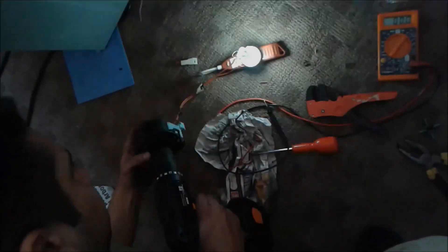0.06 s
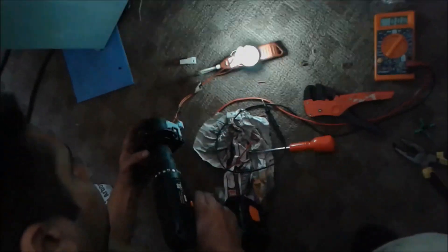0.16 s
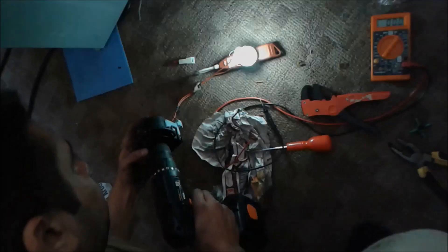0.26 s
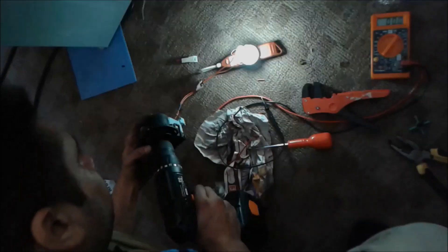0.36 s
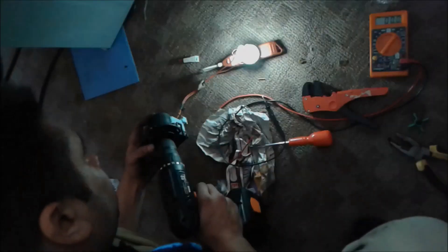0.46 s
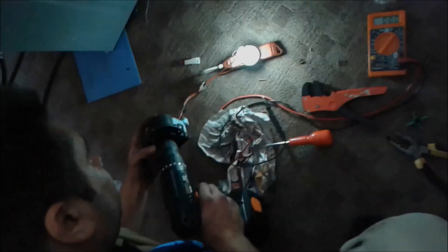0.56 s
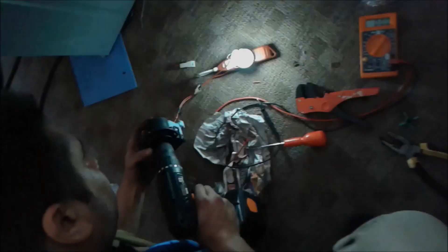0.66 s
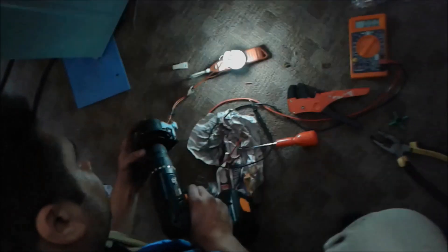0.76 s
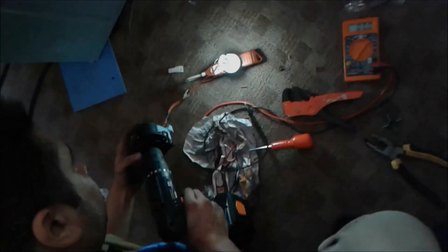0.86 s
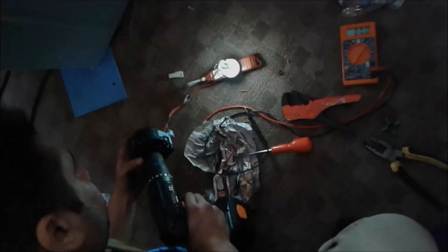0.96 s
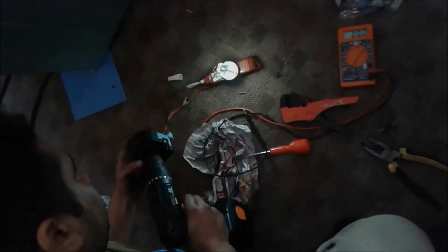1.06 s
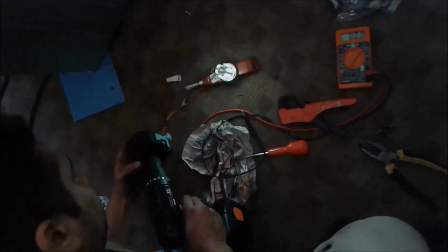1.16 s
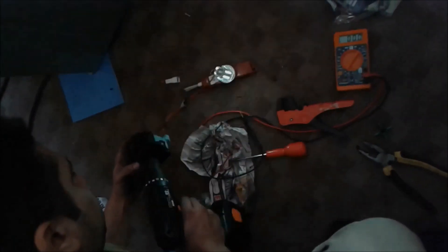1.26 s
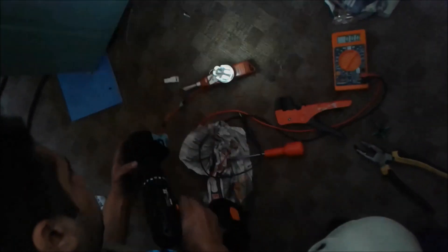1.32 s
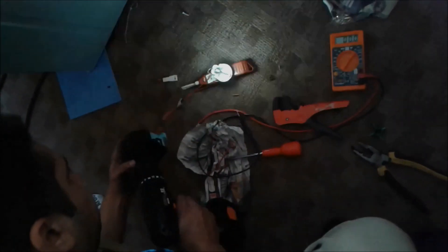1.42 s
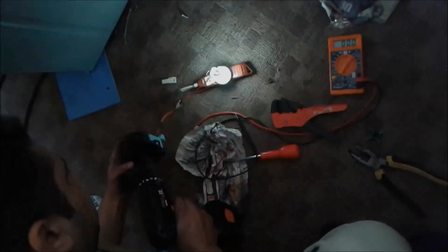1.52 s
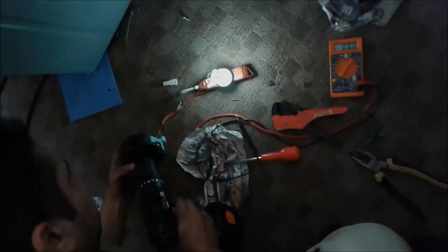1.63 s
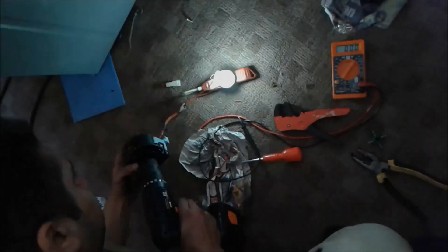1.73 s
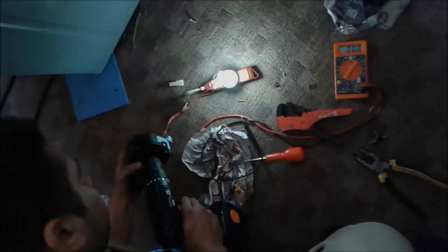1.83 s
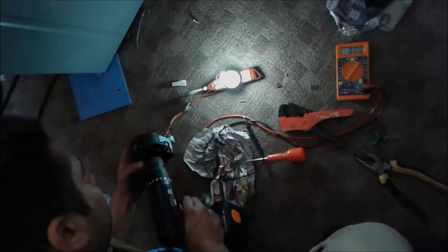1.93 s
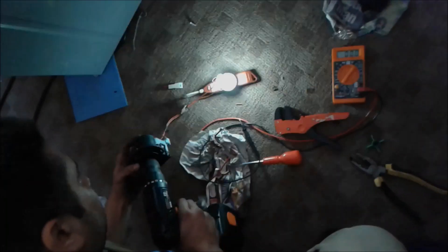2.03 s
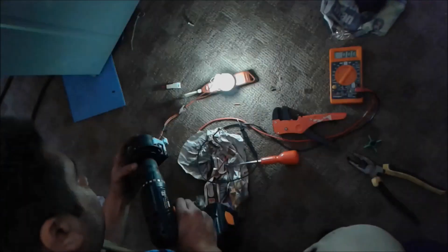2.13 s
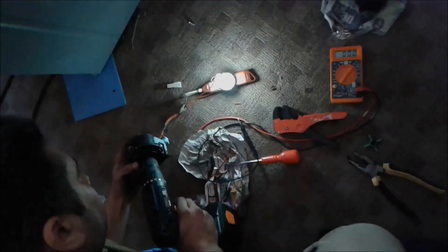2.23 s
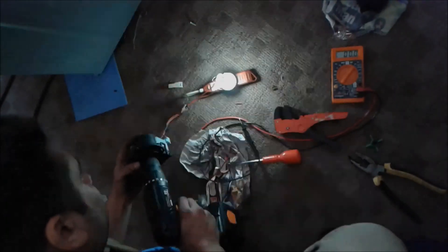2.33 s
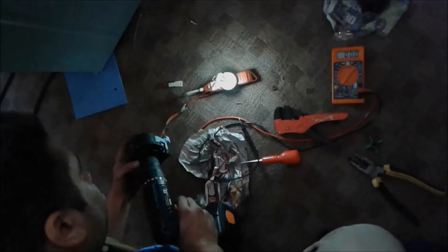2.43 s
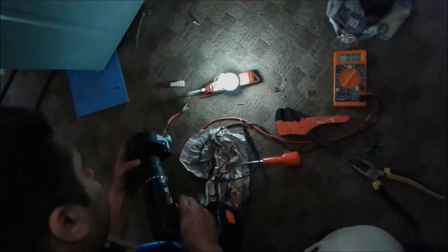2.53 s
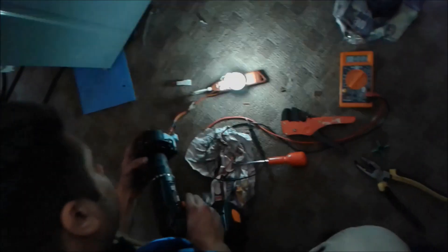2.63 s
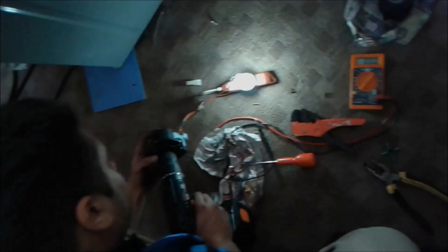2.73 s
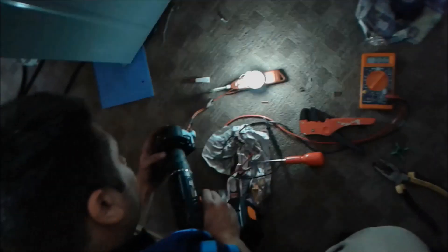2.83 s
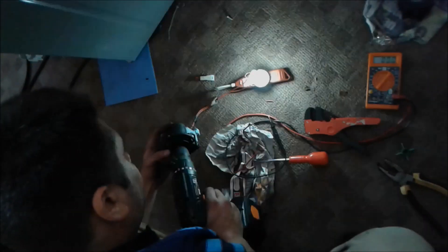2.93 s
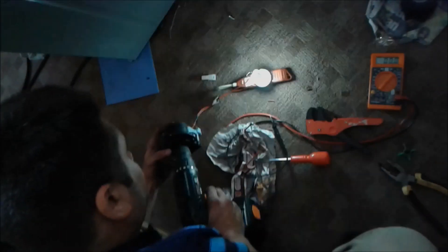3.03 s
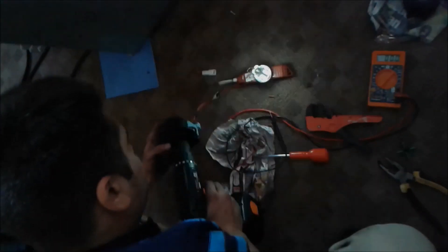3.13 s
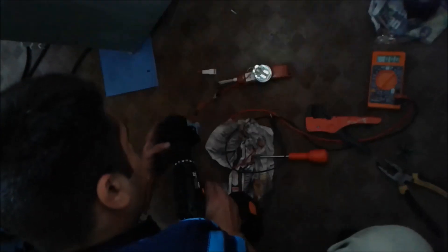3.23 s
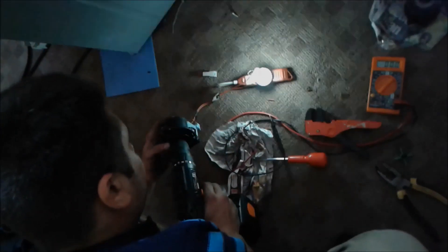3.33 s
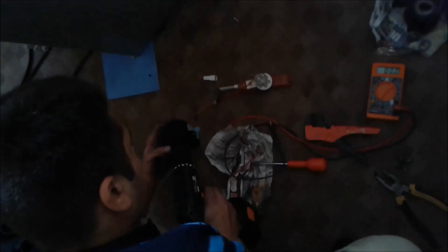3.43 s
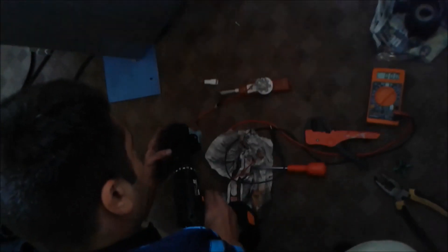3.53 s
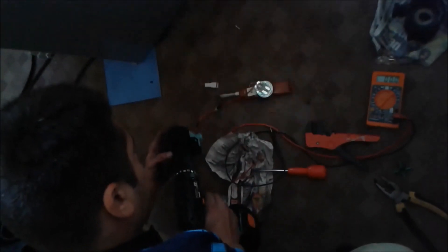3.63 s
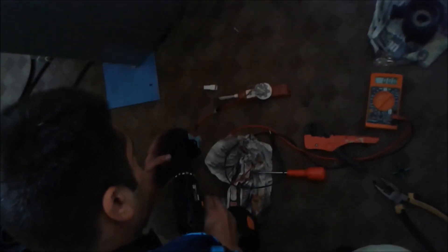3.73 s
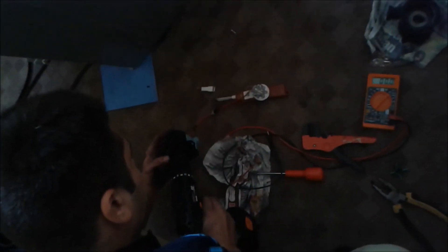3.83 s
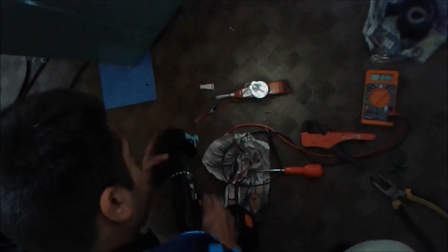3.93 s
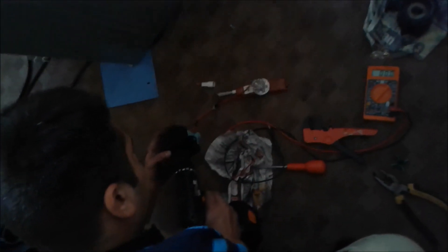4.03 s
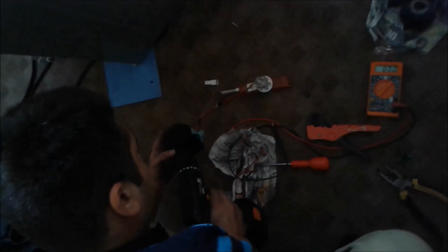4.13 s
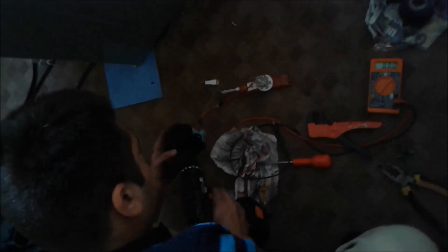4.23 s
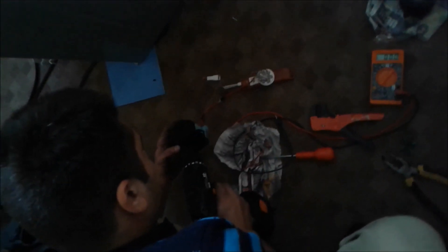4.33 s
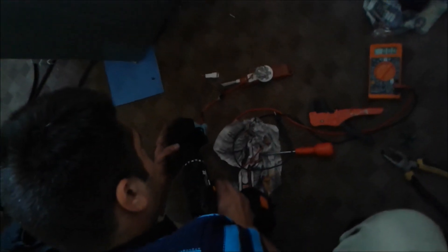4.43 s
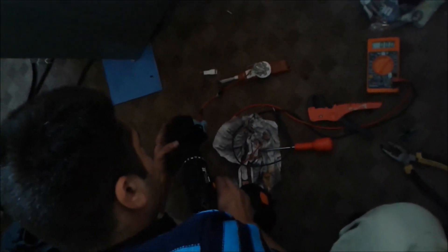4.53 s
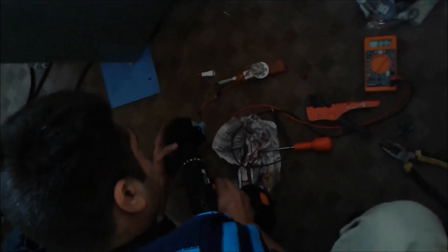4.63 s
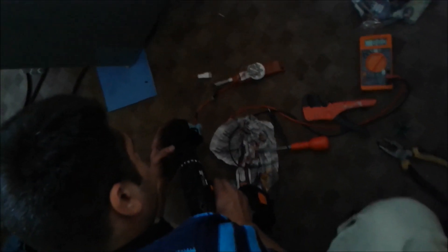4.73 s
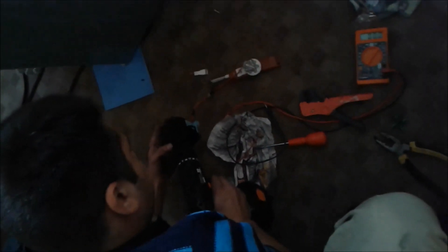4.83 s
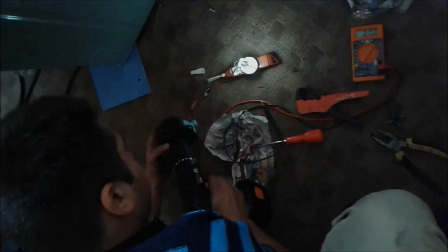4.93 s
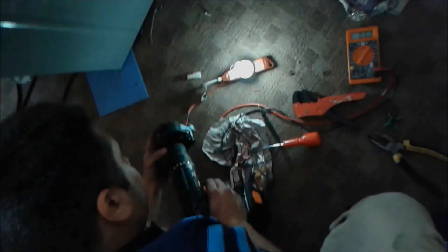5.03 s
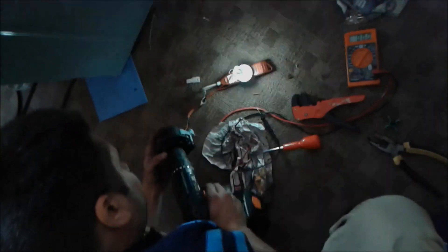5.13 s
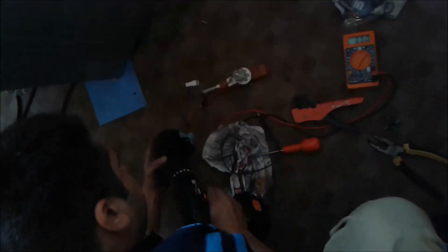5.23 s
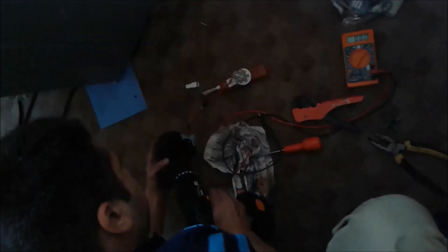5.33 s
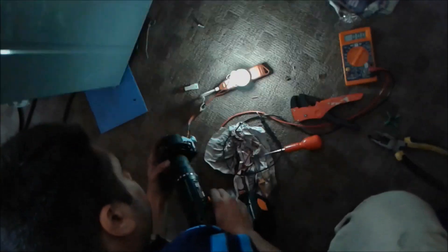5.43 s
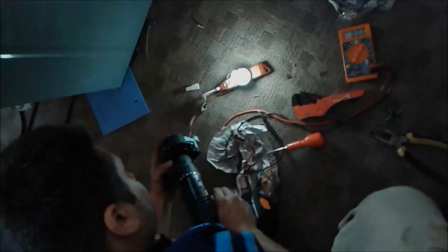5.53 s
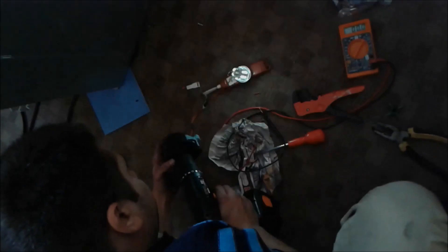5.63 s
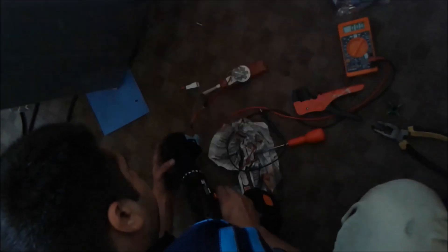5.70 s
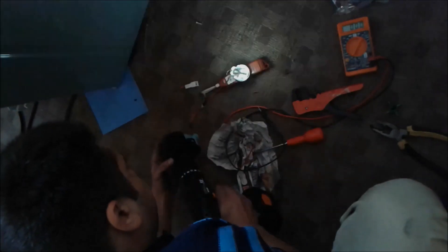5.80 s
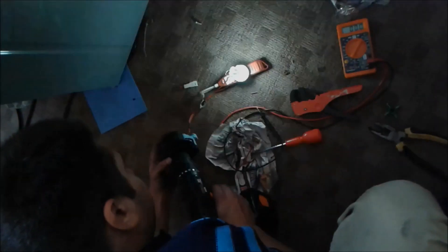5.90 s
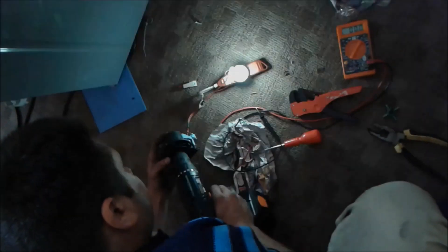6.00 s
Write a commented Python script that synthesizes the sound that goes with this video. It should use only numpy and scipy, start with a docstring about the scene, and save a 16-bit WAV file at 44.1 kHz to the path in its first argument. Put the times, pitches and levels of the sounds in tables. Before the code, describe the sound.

Close gritty drill-motor buzz with a fast throb, gliding down to a rattling stop, brief quiet, then clacks and a squealing, labouring restart indoors.

```python
"""A cordless drill close by on the floor of a small room first runs at full speed, a pump motor in its chuck.
Random gear-tooth impacts, shaped by spectral peaks of the housing and of a close reflection, throb with the
chuck under shaft-locked sine tones. As the trigger is eased the drill winds down, the tone of its torque ripple
gliding, then creeps and stops. Clacks of play precede and follow a restart below full speed, which sags twice as
the pump binds; brief squeals, made of unsteady resonances, sound as the rotor picks up speed."""
import sys
import numpy as np
from scipy import signal
from scipy.fft import rfft, irfft
from scipy.io import wavfile
from scipy.ndimage import uniform_filter1d

SR = 44100
rng = np.random.default_rng(int(sys.argv[2]) if len(sys.argv) > 2 else 0)


def persist_wave(psi):
    """Save psi, clipped to +-1, as 16-bit WAV."""
    counts = np.round(np.clip(psi, -1, 1) * 32767).astype(np.int16)
    wavfile.write(sys.argv[1], SR, np.atleast_2d(counts).T)


N = 267246
TIME = np.arange(N) / SR  # s
BINS = np.maximum(np.arange(N // 2 + 1) * SR / N, 1)  # f/Hz of each spectral bin

# Levels of the drill's parts are relative: throbs, resonances and the mix gain come on top.
# Rotor partials at full speed: [multiple of rotor rate, level/dB]
ROTOR_LINES = [(2, -60.5), (3, -54.5), (6, -57.5), (8, -61.5), (9, -53), (10, -66.5), (12, -50.5),
               (13, -50), (14, -55.5), (15, -60.5), (17, -65), (18, -52), (20, -71), (21, -74), (23, -66.5),
               (24, -60.5), (25, -60.5), (27, -61), (29, -68), (30, -63.5), (39, -67.5)]
# Planet gear partials: [multiple of planet mesh rate, level/dB]
PLANET_LINES = [(.2, -68), (.5, -62), (1, -53), (1.5, -60), (2, -60)]
# Overtones of the pole whine: [multiple of rotor rate, level relative to the whine/dB]
RIPPLE_LINES = [(2, -7), (4, -10), (5, -10), (6, -4), (9, -7), (12, -7)]
# Resonances of the housing, and peaks from a close reflection:
#   [f/Hz, width/Hz, lift at full speed/dB, lift at part speed/dB]
SPECTRAL_PEAKS = [(410, 47, 6, 2), (535.4, 98, 8.5, 7.5), (810, 190, 12, 14), (1290, 350, 9.5, 8.5),
                  (1766, 264, 6.5, 6), (1850, 74, 0, 2), (2490, 480, 6.5, 4.5), (3070, 100, 0.4, 2.5),
                  (3090, 520, 4.5, -1.5), (3870, 440, 4, 5.5), (5490, 1130, 6, 4.5), (6350, 130, 1.1, -1.5),
                  (6990, 130, -0.5, 2.5), (8100, 160, 0.5, 4.5), (8300, 160, 0.5, -0.5),
                  (9000, 1243, 0.5, 2), (9100, 170, 2, 3.5), (10230, 180, 4, 2.5), (10800, 190, 2.5, 2),
                  (12000, 200, 5.5, 1), (12300, 960, 4.5, 2.5), (12520, 210, 1.5, 1), (13210, 220, 0, -4),
                  (13743, 893, 5.5, 4), (13780, 230, 2, -1)]
# Spectrum of the tooth impacts: [f/Hz, level at full speed/dB, level at part speed/dB]
TEETH_COLOUR = [(30, -25.5, -19), (70, -22, -19.5), (130, -21, -14), (340, -14, -9.5), (650, -13, -7),
                (980, -10.5, -8.5), (2100, -5, -.5), (4780, 1, 2.5), (6800, -3, -4), (9500, -6.5, -11),
                (11070, -13.5, -15.5), (15400, -17.5, -17.5)]
# Housing modes that swell at random at full speed: [f/Hz, width/Hz, level/dB, extra level at first/dB]
SWELL_MODES = [(1298, 90, -57.5, 6.5), (1812, 245, -58, 13.5), (2657, 200, -49, -6), (4200, 230, -54, -0.5),
               (5250, 280, -49, -9.5), (5610, 260, -60, 12)]
# Spectrum of the indoor air: [f/Hz, level/dB]
ROOM_AIR = [(25, -18), (60, -14.5), (110, -17.5), (200, -9.5), (420, -10.5), (850, -15), (2000, -18),
            (5500, -23), (15000, -25)]
# Short low pulses: [t/s, f/Hz, peak level/dB, length/s]
LOW_PULSES = [(0.439, 110, -58, 0.011), (5.788, 230, -35.5, 0.0019)]
# Faint low drones: [t/s, f/Hz, level/dB, half length/s]
DRONES = [(0.763, 187, -61, 0.19), (1.836, 211, -61.5, .06), (5.11, 201, -68.5, 0.082)]
# Rotor speed as the trigger is eased: [t/s, rotor turns per second f/Hz]
WIND_DOWN = [(3.5, 249.7), (3.7, 194.8), (3.9, 150.4), (4.06, 118), (4.2, 93), (4.34, 69.6), (4.44, 86),
             (4.58, 65.4), (4.63, 36)]
# Fade of the full-speed sound into the part-speed sound: [t/s, share]
FULL_SHARE = [(3.1, 1), (3.3, 0.2), (3.6, 0)]
# Sharp resonances that the pole whine sweeps through: [f/Hz, width/Hz, lift/dB]
WHINE_MODES = [(505, 40, 0.5), (556, 35, 2.5), (720, 80, 4.5), (1433, 200, 9), (2380, 260, 5)]
# Spectrum of the pump's shudder: [f/Hz, level/dB]
RUMBLE_COLOUR = [(40, -25), (100, -5.5), (190, -4.5), (260, -5), (450, -25)]
# Clacks of play in the chuck and coupling: [t/s, nominal level/dB, t60 of the ring/s]
CLACKS = [(3.572, -26, .11), (3.749, -23, .045), (3.78, -31, .1), (3.977, -29, .04), (4.39, -48, .08),
          (4.70, -68, .08), (4.848, -63, .12), (4.984, -50, .04), (5.074, -34, .03), (5.24, -36, .06),
          (5.368, -29, .06), (5.49, -32, .08)]
# Spectrum of the clacks: [f/Hz, level/dB]
CLACK_COLOUR = [(200, -30), (800, -9), (2200, -1), (4000, 2.5), (5600, 4), (7500, -6.5), (15000, -24)]
# How hard the gears bite after the restart: [t/s, level/dB]
BITE = [(4.98, -10.5), (5.12, -7), (5.35, -4), (5.5, -2.5), (6.06, -1)]
# Squeals as the rotor picks up speed: [t/s, strength/dB, half length/s]
SQUEALS = [(5.08, -4.5, .012), (5.511, 1.5, 0.019), (5.882, 3, 0.018)]
# Resonances that ring in each squeal: [f/Hz, width/Hz, level/dB]
SQUEAL_MODES = [(796, 35, -41.5), (2380, 300, -40.5)]
# Moments when the pump binds: [slowest moment t/s, speed lost f/Hz, build-up time/s]
BINDS = [(5.46, 74, .28), (5.83, 60.7, .19)]
# Gear rattle by band: [lower f/Hz, upper f/Hz, level at full speed/dB,
#   loss per octave of slowing/dB, further loss per octave of creeping/dB]
RATTLE_BANDS = [(0, 2000, -40.5, 6.6, 8.6), (2000, 7000, -34, 7.2, 13.5), (7000, SR, -40.5, 10, 13)]

FULL_HZ, CREEP_HZ = 347.7, 122.6  # full rotor speed; speed below which the motor barely pulls
PLANET_ORDER, GEAR_RATIO = 2.483, 36.03  # planet meshes per rotor turn; rotor turns per chuck turn
EASE_S, STOP_S = 3.16, 4.76
RESTART_S, RESTART_HZ, SPIN_UP_S = 4.979, 320.4, .052  # exponential approach to the new speed
LET_GO_S = .12  # time the rotor takes to recover from a bind
SETTLE_S = .95  # time constant of the settling
SETTLE_BODY_DB, SETTLE_HUM_DB = 2.5, -55  # extra low rattle and hum at time zero
HUM_DB, HUM_PEAK_HZ, HUM_WIDTH_HZ = -56, 301, 36  # unbalance shakes the drill most near one rotor speed
RIPPLE_DB, RIPPLE_SLIP_HZ = -52, 102  # whine grows with the speed lost, up to this loss
RIPPLE_THROB_DB, BITE_SHARE = -0.2, 0.65  # whine's share of the chuck throb and of the gears' bite
RUMBLE_DB, RUMBLE_PEAK_HZ, RUMBLE_OCTAVES = -67.5, 138, .65  # pump shudders most at this rotor speed
CREEP_JUDDER_DB, CREEP_JUDDER_RATE = 1, 70  # uneven gear level when creeping; chances per second
TOP_HZ = 15680  # upper edge of the spectrum


def undb(db):
    """Amplitude ratio is ten to the power of level over 20."""
    return 10 ** (np.asarray(db) / 20)


def unit(x):
    """Normalization divides a signal by its rms value."""
    return x / np.sqrt(np.mean(x ** 2))


def curve(rows, axis=1):
    """Linear interpolation joins one table column in time."""
    rows = np.array(rows)
    return np.interp(TIME, rows[:, 0], rows[:, axis])


def slope(rows, axis=1):
    """Interpolation over log frequency gives a spectrum in dB at every bin."""
    rows = np.array(rows)
    return np.interp(np.log(BINS), np.log(rows[:, 0]), rows[:, axis])


def lift(table, axis=2):
    """Resonance-shaped peaks, added in dB, give the lift at every bin."""
    return sum(row[axis] / (1 + (2 * (BINS - row[0]) / row[1]) ** 2) for row in table)


def colour(x, db):
    """Linear filtering multiplies the spectrum by a gain given in dB."""
    return irfft(rfft(x) * undb(db), N)


def bell(x, centre, spread):
    """A Gaussian hump of height 1 models a smooth rise and fall."""
    return np.exp(-((x - centre) / spread) ** 2 / 2)


def walk(rate):
    """Random steps at a given rate per second, smoothed twice, make a fluctuation of rms near 1."""
    k = max(int(SR / rate), 1)
    steps = np.repeat(rng.standard_normal(N // k + 1), k)
    smooth = uniform_filter1d(uniform_filter1d(steps, k), k)
    return unit(smooth[:N])


def ring(hz, width_hz, grit_db=3):
    """Random drive keeps a resonance ringing, unsteady in pitch and level."""
    phase = 2 * np.pi * np.cumsum(hz + .4 * width_hz * walk(2 * width_hz)) / SR
    return unit(np.sin(phase) * undb(grit_db * walk(2 * width_hz)))


def lines(turns, table, flutter_db, flutter_rate, wander, wander_rate):
    """Partials follow shaft angle; each flutters in level and wanders in phase (radians)."""
    total = 0
    for order, db in table:
        level = np.sqrt(2) * undb(db + flutter_db * walk(flutter_rate))
        phase = 2 * np.pi * (order * turns + rng.random()) + wander * walk(wander_rate)
        total = total + level * np.sin(phase)
    return total


def room(x, wet_db=-10, t60=0.15):
    """Reflections from floor and furniture form a diffuse, exponentially decaying tail."""
    age = TIME[:SR // 2]
    tail = rng.standard_normal(len(age)) * np.exp(-np.log(1000) * age / t60) * (age > .003)
    tail = tail / np.sqrt(np.sum(tail ** 2))
    return x + undb(wet_db) * signal.fftconvolve(x, tail)[:N]


def speed():
    """Drive against load sets rotor turns per second: full, wind-down, stop, spin-up with binds."""
    first = curve([(EASE_S, FULL_HZ), *WIND_DOWN, (STOP_S, 0)])
    second = RESTART_HZ * (1 - np.exp(-np.maximum(TIME - RESTART_S, 0) / SPIN_UP_S))
    for s, lost_hz, build_s in BINDS:
        drag = curve([(s - build_s, 0), (s, 1), (s + LET_GO_S, 0)])
        second = second - lost_hz * np.sin(np.pi / 2 * drag) ** 2
    return np.maximum(first + second, 10)  # the floor keeps logarithms and ratios finite


def throb(turns):
    """An off-centre coupling binds once a chuck turn, and more weakly at the second harmonic."""
    angle = 2 * np.pi * turns / GEAR_RATIO
    return np.cos(angle - .7) + .55 * np.cos(2 * angle + .3)


def settling():
    """Exponential relaxation from 1 follows the pump settling in the chuck."""
    return np.exp(-TIME / SETTLE_S)


def bite():
    """Gear load sets a level in dB: 0 until the restart, then reduced and slowly recovering."""
    return curve(BITE) * (TIME > RESTART_S)


def background(air_db=-81, mains_db=-90, mains_hz=50):
    """Broadband noise of still indoor air adds to a pure tone of mains hum."""
    air = unit(colour(rng.standard_normal(N), slope(ROOM_AIR))) * undb(air_db + walk(5))
    return air + undb(mains_db) * np.sqrt(2) * np.sin(2 * np.pi * mains_hz * TIME)


def gears(hz, turns, full, impacts_per_turn=18, scatter_db=1.6, rub_db=-2, flicker_db=.55):
    """Random tooth impacts and sliding hiss drive the spectral peaks; slower is softer and duller."""
    hit = rng.random(N) < impacts_per_turn * hz / SR
    strength = undb(scatter_db * rng.standard_normal(N))
    # dividing by the root of the rate keeps the mean power of the taps even
    taps = unit(hit * rng.choice([-1, 1], N) * strength / np.sqrt(hz))
    force = unit(taps + undb(rub_db) * rng.standard_normal(N))
    # the teeth press harder once a rotor turn and with the chuck throb
    load_db = 0.22 * np.cos(2 * np.pi * turns) + .8 * throb(turns)
    force = force * undb(flicker_db * walk(110) + load_db)
    fast = colour(force, slope(TEETH_COLOUR, axis=1) + lift(SPECTRAL_PEAKS, axis=2))
    slow = colour(force, slope(TEETH_COLOUR, axis=2) + lift(SPECTRAL_PEAKS, axis=3))
    slowing = np.log2(FULL_HZ / hz)  # octaves
    creeping = np.maximum(np.log2(CREEP_HZ / hz), 0)  # octaves
    judder_db = CREEP_JUDDER_DB * walk(CREEP_JUDDER_RATE) * (hz < CREEP_HZ)
    body_db = SETTLE_BODY_DB * settling() - 1.9 * full  # lowest band only
    rattle = 0
    for (lo, hi, db, slow_db, creep_db), extra_db in zip(RATTLE_BANDS, (body_db, 0, 0)):
        band = (BINS >= lo) & (BINS < hi)
        fast_part = unit(irfft(rfft(fast) * band, N))
        slow_part = unit(irfft(rfft(slow) * band, N))
        level_db = db - slow_db * slowing - creep_db * creeping + bite() + judder_db + extra_db
        rattle = rattle + undb(level_db) * (full * fast_part + (1 - full) * slow_part)
    return rattle


def swells(full, swell_db=2.5, swell_rate=3):
    """Independently fluctuating housing modes slowly swell and fade at full speed."""
    total = 0
    for hz, width_hz, db, first_db in SWELL_MODES:
        level_db = db + first_db * settling() + swell_db * walk(swell_rate)
        total = total + undb(level_db) * ring(hz, width_hz, grit_db=2)
    return full * total


def rotor(hz, turns, full):
    """Rotation gives harmonics at full speed, over an unbalance hum that wavers at part speed."""
    whine = lines(turns, ROTOR_LINES, flutter_db=2, flutter_rate=14, wander=0.53, wander_rate=25)
    steady = lines(turns, [(1, 0.00076)], flutter_db=0.5, flutter_rate=25, wander=.1, wander_rate=18)
    wavering = lines(turns, [(1, 0)], flutter_db=2.5, flutter_rate=50, wander=.3, wander_rate=60)
    shake = undb(HUM_DB + bite()) * bell(hz, HUM_PEAK_HZ, HUM_WIDTH_HZ)
    first_hum = undb(SETTLE_HUM_DB) * settling() * steady
    return full ** 3 * whine + first_hum + np.sqrt(1 - full) * shake * wavering


def planets(hz, turns, full, level_db=-1, part_speed_db=-6, chatter_db=-56, chatter_hz=850):
    """Periodic meshing sings and chatters, pulsing with the chuck; the song fades as the rotor slows."""
    mesh_turns = turns * PLANET_ORDER
    song = lines(mesh_turns, PLANET_LINES, flutter_db=2, flutter_rate=30, wander=.8, wander_rate=30)
    chatter_phase = 2 * np.pi * np.cumsum(chatter_hz + 40 * walk(200)) / SR
    chatter = undb(chatter_db) * unit(np.sin(chatter_phase) * undb(3 * walk(150)))
    strength = full * undb(level_db) + (1 - full) * undb(part_speed_db) * (hz / FULL_HZ) ** 3
    return (strength * song + full * chatter) * undb(4.5 * throb(turns))


def rumble(hz, uneven_db=3.5):
    """Resonant response to rotor speed makes the pump body shudder dully when it turns slowly."""
    shudder = unit(colour(rng.standard_normal(N), slope(RUMBLE_COLOUR)))
    response = bell(np.log2(hz / RUMBLE_PEAK_HZ), 0, RUMBLE_OCTAVES)
    return undb(RUMBLE_DB + uneven_db * walk(7.7)) * response * shudder


def low_pulses():
    """Amplitude modulation gives short sine pulses under a Gaussian envelope."""
    total = 0
    for s, hz, db, length in LOW_PULSES:
        total = total - undb(db) * bell(TIME, s, length) * np.sin(2 * np.pi * hz * (TIME - s))
    return total


def drones(width_hz=12):
    """Narrow-band resonance gives a faint low tone that comes and goes under the rattle."""
    return sum(undb(db) * bell(TIME, s, length) * ring(hz, width_hz) for s, hz, db, length in DRONES)


def poles(hz, turns):
    """Torque ripple three times a turn makes a gliding tone, shaped by the spectral peaks at part speed."""
    tone = lines(turns, [(3, 0)], flutter_db=3.6, flutter_rate=80, wander=.38, wander_rate=90)
    overtones = lines(turns, RIPPLE_LINES, flutter_db=3, flutter_rate=80, wander=.42, wander_rate=90)
    drive = np.clip((hz - 160) / 80, 0, 1)  # overtones need speed
    slip = np.clip((FULL_HZ - hz) / RIPPLE_SLIP_HZ, 0, 1)
    pulling = np.clip((hz - CREEP_HZ) / 20, 0, 1)
    level_db = RIPPLE_DB + RIPPLE_THROB_DB * throb(turns) + BITE_SHARE * bite()
    level = undb(level_db) * slip * pulling
    peaks_db = lift(SPECTRAL_PEAKS, axis=3) - 8
    whine = colour(level * tone, .3 * peaks_db) + colour(level * drive * overtones, .9 * peaks_db)
    # the gliding tone beats against its own echoes, so its strength is uneven
    return room(colour(whine, lift(WHINE_MODES)), wet_db=-7, t60=.12)


def clacks(crack_db=-2, ring_db=-12, crack_s=.002):
    """Impact across the coupling's play gives a short crack, then an exponentially decaying noisy ring."""
    envelope = np.zeros(N)
    for start, db, t60 in CLACKS:
        age = np.maximum(TIME - start, 0)
        crack = undb(crack_db) / 2 * np.exp(-age / crack_s)
        tail = undb(ring_db) * np.exp(-np.log(1000) * age / t60)
        envelope += (TIME >= start) * undb(db) * (crack + tail)
    return envelope * unit(colour(rng.standard_normal(N), slope(CLACK_COLOUR)))


def squeals():
    """Resonant excitation makes the housing squeal briefly as the rotor picks up speed."""
    envelope = sum(undb(db) * bell(TIME, s, length) for s, db, length in SQUEALS)
    return envelope * sum(undb(db) * ring(hz, width_hz) for hz, width_hz, db in SQUEAL_MODES)


def scene():
    """Superposition adds all sources, the drill's driven by one rotor speed; left equals right."""
    hz = speed()
    turns = np.cumsum(hz) / SR
    full = np.clip(curve(FULL_SHARE), 0, 1)  # share of the full-speed sound
    rattle = room(gears(hz, turns, full) + clacks()) + swells(full) + squeals()
    whine = rotor(hz, turns, full) + poles(hz, turns) + planets(hz, turns, full)
    drill = undb(-0.85) * (rattle + whine)
    mono = drill + drones() + rumble(hz) + low_pulses() + background()
    return np.array([mono, mono])


def record(dry):
    """A steep elliptic low-pass filter removes the top of the spectrum."""
    return signal.sosfilt(signal.ellip(12, .1, 80, TOP_HZ, fs=SR, output="sos"), dry)


dry = scene()
out = record(dry)
persist_wave(out)
```